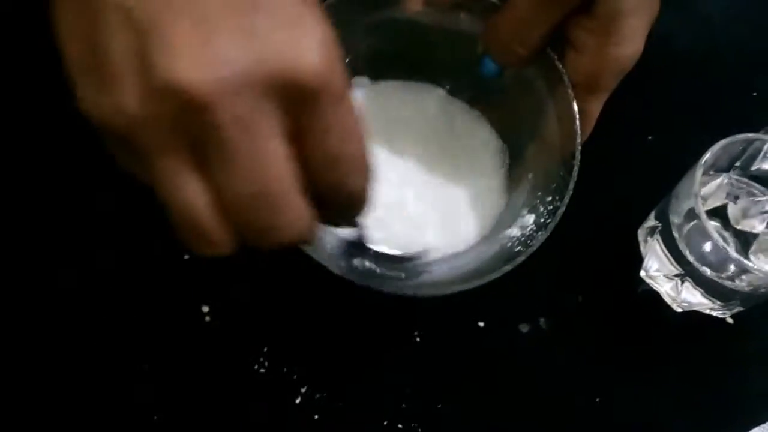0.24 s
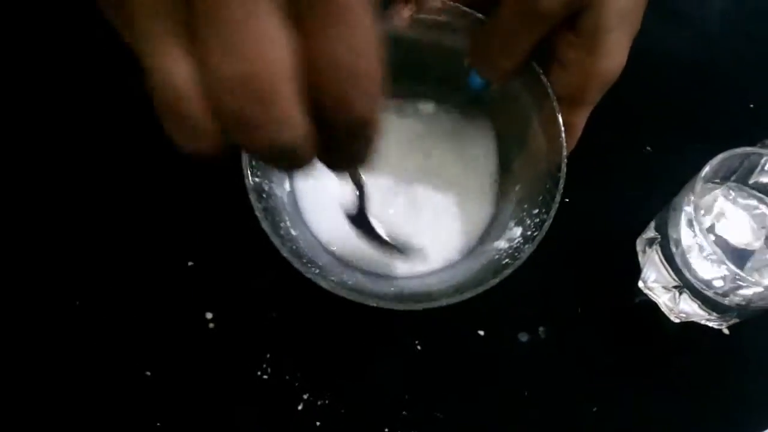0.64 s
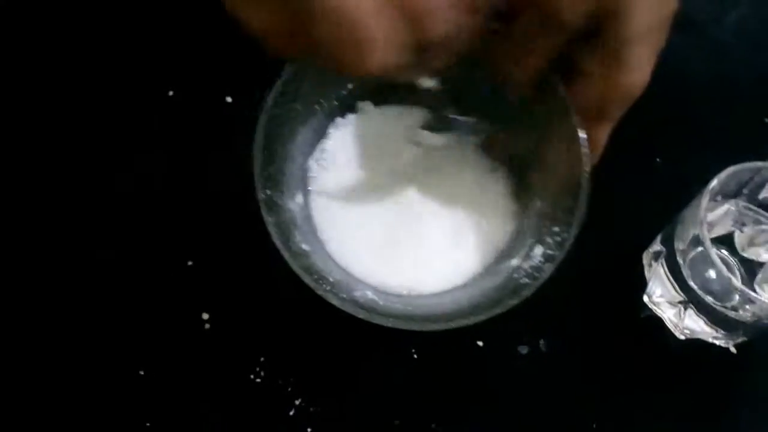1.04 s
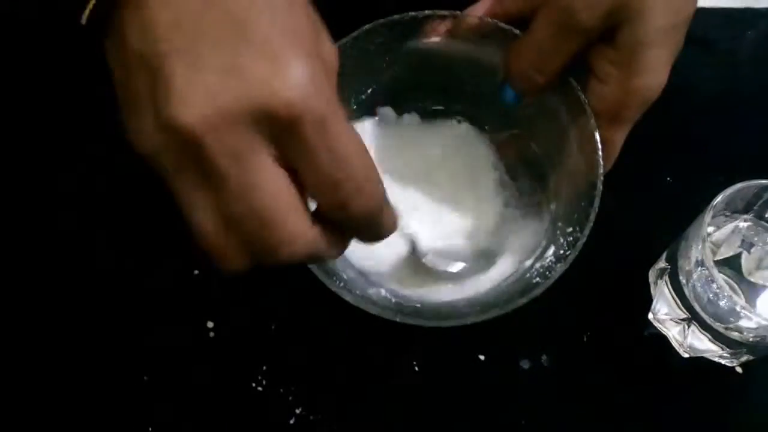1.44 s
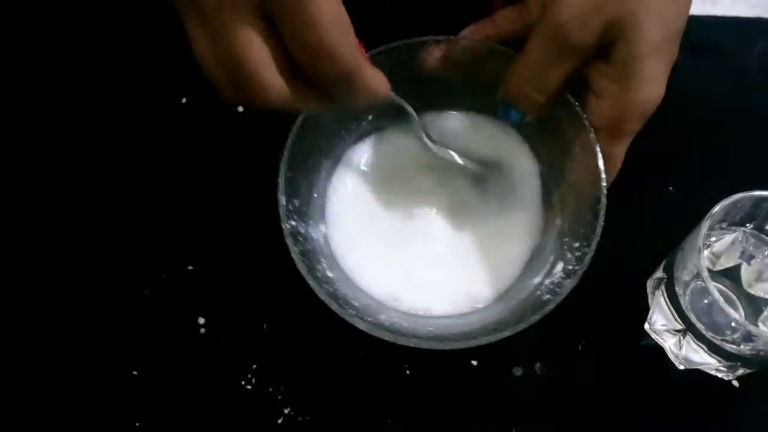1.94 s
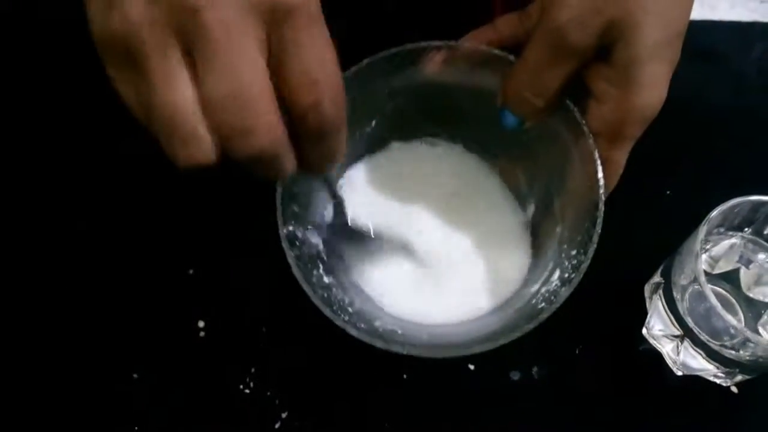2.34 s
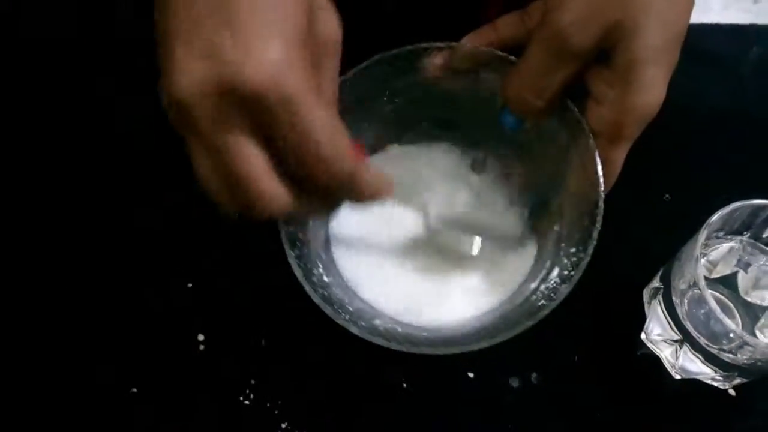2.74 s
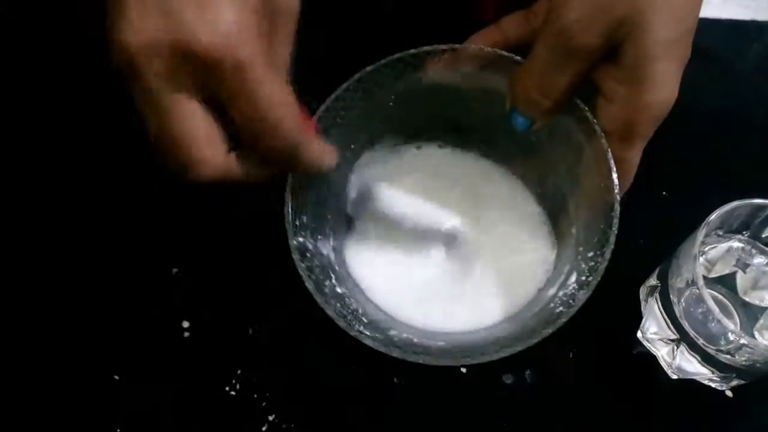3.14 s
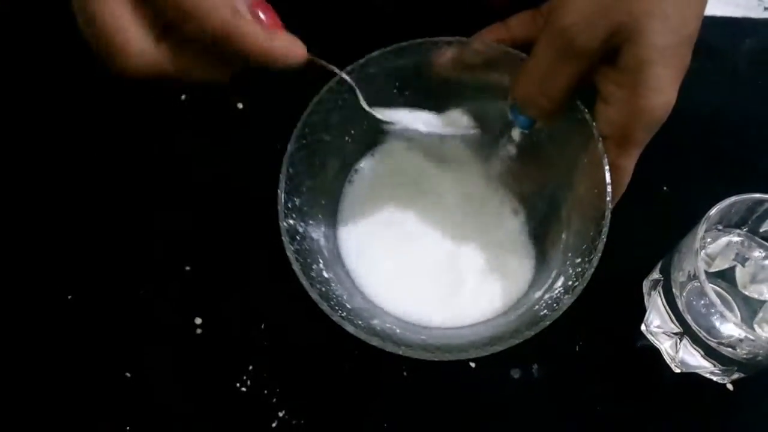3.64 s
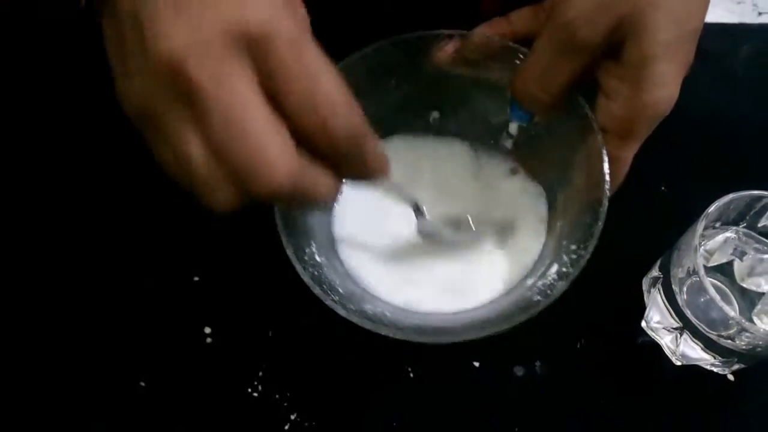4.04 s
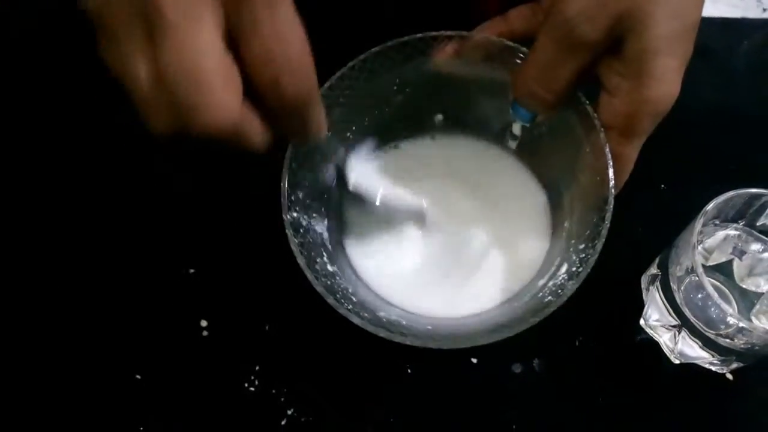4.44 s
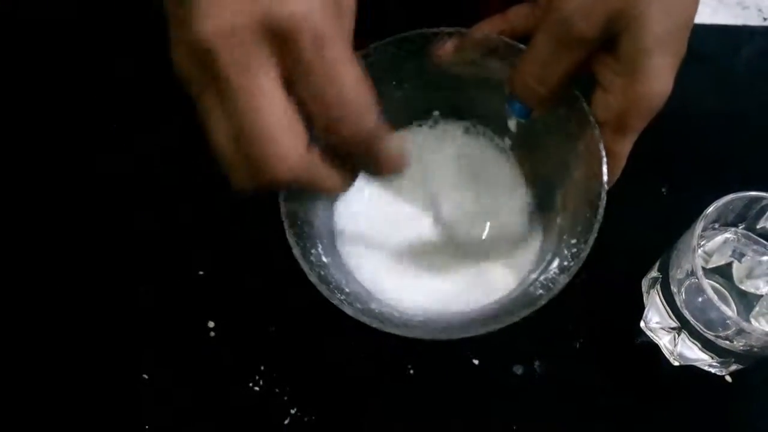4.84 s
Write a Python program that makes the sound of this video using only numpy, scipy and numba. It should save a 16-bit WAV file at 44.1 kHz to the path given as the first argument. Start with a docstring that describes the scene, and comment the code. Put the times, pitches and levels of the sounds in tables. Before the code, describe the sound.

A metal spoon stirs liquid in a glass bowl, with quick gritty scrapes and a few sharp clinks, close up.

```python
"""A metal spoon stirs a milky liquid in a hand-held glass bowl, in a small kitchen.
First come short strokes: the spoon grinds over undissolved grains, swelling, easing, turning hollower.
It hits the wall hard at 0.8 s, slides on dry glass and hits again at 1.2 s; hand and liquid damp it.
Strokes, taps and bubble chirps go on to 4.9 s; a squeak at 2.9 s, a thin rasp at 3.1 s, a drip at 3.8 s.
Throughout, the close microphone hisses faintly; a limiter holds the peaks."""
import sys
import numpy as np
from scipy import signal
from scipy.fft import rfft, irfft
from scipy.io import wavfile
from scipy.ndimage import uniform_filter1d, minimum_filter1d
from numba import njit

SR = 44100
rng = np.random.default_rng(int(sys.argv[2]) if len(sys.argv) > 2 else 0)


def inscribe(sig):
    """Save sig as 16-bit PCM at rate SR to the path in sys.argv[1].

    A 1-D sig is mono; a 2-D sig holds one channel per row.
    Samples are clipped to [-1, 1] before scaling.
    """
    pcm = np.round(np.clip(np.atleast_2d(sig).T, -1, 1) * 32767)
    wavfile.write(sys.argv[1], SR, pcm.astype(np.int16))


N = 224763
TIME = np.arange(N) / SR


def stirring(hollow_growth_db=1.5, lead_s=.02):
    """Spoon strokes: gains of the middle, hollow and bite bands, and the spoon's pitch."""
    # start/s, firmest/s, end/s, level/dB, swell/dB, hollow/dB rel., bite/dB rel., f start/Hz, f end/Hz
    strokes = [(0.112, 0.120, 0.158, -38, 9, -13, -31, 2294, 2480),
               (0.355, 0.365, 0.405, -39.5, 5, -3, -2.5, 2300, 2390),
               (0.455, 0.514, 0.56, -19.5, 21.5, -4.5, -1, 2260, 1890),
               (1.340, 1.440, 1.404, -31.5, 1.5, -7, -3, 2120, 2130),
               (1.480, 1.520, 1.64, -46.5, 0, -8.5, -0.5, 2300, 2250),
               (1.670, 1.765, 1.943, -26.5, 10.5, -6, -7, 2026, 2190),
               (2.200, 2.242, 2.256, -42.5, 2, 6, -12, 2540, 2430),
               (2.290, 2.345, 2.4, -31, 4, -16, -8.5, 2338, 2260),
               (2.400, 2.460, 2.585, -25.5, 5.5, -14, -2.5, 2320, 2600),
               (2.780, 2.830, 2.86, -41, 0, -10, -10, 2450, 2430),
               (2.920, 2.955, 2.93, -41, 17, -18, -18, 2320, 2270),
               (3.050, 3.245, 3.300, -30.5, 10.5, -5.5, -3, 2230, 2020),
               (3.905, 3.915, 3.975, -44, 10, -16, -22, 2640, 2430),
               (4.058, 4.115, 4.172, -42.5, 3, 3.5, -5, 2180, 2220),
               (4.380, 4.495, 4.682, -22, 23, -10.5, -5.5, 2240, 2150),
               (4.810, 4.842, 4.910, -38, 12.5, 5, -3.5, 2170, 2197),
               (4.950, 4.995, 4.85, -39.5, 1, -10, -19, 2470, 2370)]
    middle, hollow, bite = np.zeros((3, N))
    spoon_hz = np.full(N, float(strokes[0][-2]))
    for start_s, firmest_s, end_s, level_db, swell_db, hollow_db, bite_db, start_hz, end_hz in strokes:
        press = pressure(start_s, firmest_s, end_s, level_db, swell_db)
        progress = np.clip((TIME - start_s) / (end_s - start_s), 0, 1)
        hollow += press * from_db(hollow_db + hollow_growth_db * (progress - .5))
        bite += press * from_db(bite_db)
        middle += press * np.sqrt(np.clip(1 - from_db(bite_db) ** 2, .15, 1))   # what the bite leaves
        spoon_hz = np.where(TIME > start_s - lead_s, start_hz + (end_hz - start_hz) * progress, spoon_hz)
    return middle, hollow, bite, spoon_hz


def pressure(start_s, firmest_s, end_s, level_db, swell_db, land_s=.02, lift_s=.015, arch=1.64, ease=.67):
    """Gain of one rub: the spoon lands, presses harder in an arch, eases and lifts."""
    before = np.clip((firmest_s - TIME) / max(firmest_s - start_s, .005), 0, 1)
    after = np.clip((TIME - firmest_s) / max(end_s - firmest_s, .005), 0, 1)
    touching = np.clip(1 + np.minimum((TIME - start_s) / land_s, (end_s - TIME) / lift_s), 0, 1)
    return touching * from_db(level_db - swell_db * (before ** arch + ease * after ** arch))


def scraping(middle, hollow, bite, spoon_hz):
    """Stick-slip over grains excites spoon and glass; the liquid squelches round the spoon."""
    # spoon pressed on wet glass, three mode groups: f/Hz, width/Hz, level/dB
    hollow_modes = [(657, 117, -8.5), (957, 122, 2.5), (1246, 114, 5.5)]
    middle_modes = [(2070, 590, -4.5), (2710, 200, 2.5)]
    bite_modes = [(3302, 102, 2.5), (4300, 1530, -5), (4570, 614, 2), (4590, 660, -17.5)]
    # the spoon catches and grinds briefly: t/s, level/dB, half length/s, favoured f/Hz
    catches = [(0.518, -30, 0.0017, 3830), (1.434, -18.5, 0.0066, 4680), (1.457, -26, 0.0043, 2180),
               (1.775, -18.5, 0.0077, 3650), (1.824, -24, 0.0068, 2780), (1.865, -17, 0.0027, 3380),
               (2.241, -21, 0.0023, 2405), (2.526, -23, 0.0041, 3300), (3.185, -26, 0.003, 3860),
               (3.199, -29, 0.0025, 2200), (3.247, -13, 0.0082, 3370), (4.117, -27, 0.0059, 3700)]
    friction = grains(per_s=4500, spread_db=2) * from_db(2.5 * drift(67))
    low = body(friction, hollow_modes, wander=.016, flicker_db=3.5)
    low = rms_one(cut(low, [480, 2000], "band"))
    spoon = rms_one(resonate(friction, spoon_hz, width_hz=130.0))
    glass = body(friction, middle_modes, wander=.084, flicker_db=2.5)
    mid = rms_one(cut(spoon + from_db(-4) * glass, [1600, 3200], "band"))
    high = body(friction, bite_modes, wander=.021, flicker_db=3)
    high = rms_one(cut(cut(high, 2200, "high"), 4870, "low", order=8))
    fizz = rms_one(cut(cut(friction, 4900, "high", order=4), 5100, "low"))
    catch = sum(from_db(db - 3) * np.exp(-.5 * ((TIME - s) / half_s) ** 2) for s, db, half_s, _ in catches)
    catch_s, _, _, catch_hz = np.transpose(catches)
    grinding = rms_one(resonate(mid + high, np.interp(TIME, catch_s, catch_hz), width_hz=540.0))
    return (low * np.hypot(hollow * from_db(-2), catch * from_db(-11))
            + mid * middle * from_db(-2)
            + high * bite * from_db(-1)
            + grinding * catch
            + fizz * np.hypot(bite, catch) * from_db(-25)
            + squelch() * np.hypot(middle, bite) * from_db(-1))


def taps(tick_rows, hard_above_db=-12.5, rebound_s=.0017, rebound_hz=4330, focus_db=12, focus_oct=.13):
    """Blows ring the bowl, most near the pitch their place favours; each tap adds a crack and a thud."""
    # spoon on the wall: t/s, level/dB, favoured f/Hz, low modes/dB, treble modes/dB
    wall_taps = [(0.0990, -19, 2280, -14, -17), (0.108, -20, 2220, 1, -22), (0.1260, -22.5, 2500, 3, -16),
                 (0.4386, -15, 3800, 4, -20), (0.7907, 0.5, 2670, -9, 9.5), (1.2180, 5.5, 2940, 5, -1.5),
                 (1.2325, -11, 2120, 5.5, -20), (1.2490, -13, 905, 13, -18), (1.5220, -21, 2294, -12, -10),
                 (1.6681, -19.5, 3300, 18, -16), (1.9054, -13.5, 3480, 11.5, -30),
                 (1.9780, -22.5, 2290, 22, -14), (2.2350, -13, 2430, -2, -24), (2.3900, -2.5, 3576, -2, 0),
                 (2.4550, -11.5, 4150, 6, -21), (2.487, -11.5, 3420, 0, -28), (2.7592, -23, 3750, 5, -16),
                 (2.9080, -28, 2280, 7.5, -11), (3.3207, -13, 3930, 11, 1), (3.8874, -18.5, 2950, 8, -6),
                 (4.0560, -22, 1180, 24, -17), (4.281, -29.5, 4700, 12, -12), (4.6207, -9, 3420, 10, -2.5)]
    # modes of bowl and spoon together: f/Hz, level/dB, t60/s
    bowl_modes = [(543, -11.5, 0.018), (706, -25, 0.16), (917, -6, 0.032), (1181, -6, 0.022),
                  (2017, 4, 0.019), (2246, 0.5, 0.07), (2527, 7, 0.02), (2641, 3, 0.037), (3060, -6, 0.082),
                  (3076, 4, 0.019), (3398, -1, 0.038), (3640, -2.5, 0.035), (4300, -0.5, 0.033),
                  (4640, -10, 0.036), (4860, 6.5, 0.014), (5370, -6.5, 0.031), (6390, 3, 0.015),
                  (6380, -14.5, 0.048), (8300, -21, 0.063), (9200, -42, 0.016), (12060, -30, 0.027)]
    rings, cracks, thuds = np.zeros((3, N))
    t = TIME[:SR // 10]
    hz, mode_db, t60_s = np.transpose(bowl_modes)
    onset = 1 - np.exp(-t / .00011)
    modes = np.sin(2 * np.pi * np.outer(hz, t)) * from_db(-60 * np.outer(1 / t60_s, t)) * onset
    for s, db, place_hz, low_db, treble_db in wall_taps + tick_rows:
        hard_db = max(db - hard_above_db, 0)   # hard taps meet bare glass
        damping_db_per_s = 65 * hard_db
        dry_db = .46 * treble_db   # dry contact is livelier
        tilt_db = low_db * (hz < 1500) + treble_db * (hz > 5100)
        blows = [(s, db, place_hz)]
        if hard_db:
            blows.append((s + rebound_s, db - 3.5 + dry_db, rebound_hz))
        for blow_s, blow_db, favoured_hz in blows:
            near = np.exp(-.5 * (np.log2(hz / favoured_hz) / focus_oct) ** 2)
            scatter_db = 3.5 * rng.standard_normal(len(hz))
            gains = from_db(mode_db + focus_db * near + tilt_db + scatter_db)
            gains = gains / np.linalg.norm(gains) * rng.choice([-1, 1], len(hz))
            add(rings, blow_s, gains @ modes * from_db(blow_db - damping_db_per_s * t))
        chatter = np.tanh(2 * rng.standard_normal(len(t))) * np.exp(-t / .0023)
        add(cracks, s, from_db(db + .65 * hard_db + dry_db) * chatter)
        add(thuds, s, from_db(1.62 * db) * chatter)   # the thud grows steeply with the blow, so hard blows shake the whole bowl
    return (from_db(-3) * cut(rings, 520, "high")
            + from_db(-24) * cut(cracks, [1500, 12000], "band")
            + from_db(-30) * cut(thuds, [50, 450], "band", order=1))


def ticks(contact, tries=190, low_hz=2200, high_hz=4400, top_db=9, spread_db=8, treble_db=-16):
    """Grains pass under the spoon: rows of light random taps, scaled by its contact."""
    rows = []
    for when, weakness, place in rng.random((tries, 3)):
        press = contact[int(when * N)]
        if press > 0:
            db = 20 * np.log10(press) + top_db - spread_db * weakness
            rows.append((when * TIME[-1], db, low_hz * (high_hz / low_hz) ** place, 0, treble_db))
    return rows


def slide():
    """On dry glass above the liquid the rubbing spoon rings freely."""
    # rubs: start/s, firmest/s, end/s, level/dB, swell/dB
    slides = [(0.815, 1.01, 1.036, -32.5, 12)]
    # dry glass modes: f/Hz, width/Hz, level/dB
    dry_modes = [(2310, 600, 1), (2800, 170, 8), (3800, 160, -11), (4500, 120, 3.5), (5350, 210, -15),
                 (6400, 170, -7)]
    ring = body(grains(per_s=2800, spread_db=2), dry_modes, wander=.0051, flicker_db=4)
    return sum(pressure(*row) for row in slides) * ring


def rasp(start_hz=6340, climb_hz_per_s=13600):
    """The spoon's edge, drawn up the wall, makes a narrow climbing hiss."""
    # rub: start/s, firmest/s, end/s, level/dB, swell/dB
    rasps = [(3.105, 3.245, 3.275, -53, 9)]
    start_s, _, end_s, _, _ = rasps[0]
    hz = start_hz + climb_hz_per_s * (np.clip(TIME, start_s, end_s) - start_s)
    rubbing = grains(per_s=2500, spread_db=7) * from_db(4.2 * drift(77))
    ring = resonate(rubbing, hz, width_hz=650.0)
    return pressure(*rasps[0]) * rms_one(cut(ring, [5500, 10000], "band"))


def chirps_and_drop(tick_s=.0018):
    """Short gliding tones: bubble chirps, drips and a brief squeak of the spoon; a falling drop ticks."""
    # gliding tones: t/s, level/dB, f/Hz, rise/(oct/s), time to peak/s
    tones = [(0.354, -34.5, 3310, 5, 0.0044), (0.377, -35.5, 3580, 14, 0.0023),
             (2.221, -22.5, 2600, -3, .0015), (2.299, -19.5, 2267, 3.5, 0.003),
             (2.944, -35.5, 2300, -1.5, .01), (3.742, -37.5, 4180, -3, 0.0018),
             (3.742, -36, 2800, 5, 0.0018), (3.794, -37, 1156, 5, 0.0031), (3.812, -35, 3363, 36, 0.0019),
             (4.465, -16.5, 2063, 18.5, 0.0023), (4.480, -15.5, 2760, 43, 0.0013),
             (4.495, -15, 3917, 37, 0.0008), (4.513, -18, 4370, 13, 0.0029)]
    # drop on the surface: t/s, level/dB
    drops = [(3.792, -25.5)]
    out, t = np.zeros(N), TIME[:SR // 10]
    for s, db, hz, rise_oct_per_s, peak_s in tones:
        add(out, s, from_db(db) * gliding_tone(hz, rise_oct_per_s, peak_s))
    for s, db in drops:
        splash = rng.standard_normal(len(t)) * np.exp(-t / tick_s)
        add(out, s, from_db(db) * cut(splash, [5000, 12000], "band"))
    return out


def squelch(count=260, low_hz=2100, high_hz=4100, spread_db=10):
    """Tiny bubbles form at random behind the spoon, peaking after about eight cycles."""
    out = np.zeros(N)
    for when, pitch, weakness, rise in rng.random((count, 4)):
        hz = low_hz * (high_hz / low_hz) ** pitch
        add(out, when * TIME[-1], from_db(-spread_db * weakness) * gliding_tone(hz, 14 * rise, 8 / hz))
    return cut(out, 3600, "low", order=8)


def gliding_tone(hz, rise_oct_per_s, peak_s):
    """A short sine swells, glides in pitch and dies."""
    t = TIME[:SR // 25]
    glide_hz = hz * 2 ** np.minimum(rise_oct_per_s * t, .5)
    envelope = t / peak_s * np.exp((1 - (t / peak_s) ** 1.09) / 1.2)
    return envelope * np.sin(2 * np.pi * np.cumsum(glide_hz) / SR)


def kitchen(x, wet_db=-11.44, build_s=.0059):
    """Dense echoes off hard walls, each band dying at its own rate."""
    # echo colour: f/Hz, level/dB, t60/s
    room = [(100, -10, 0.51), (496, 3.5, 0.9), (970, 0.5, 0.25), (1380, 10.5, 0.4), (2156, 8, 0.35),
            (3270, -15.5, 0.26), (4370, -0.5, 0.4), (7060, -5, 0.22), (11000, 3.5, 0.29),
            (14300, -12, 0.38)]
    t, edges_hz = TIME[:SR * 3 // 4], np.geomspace(80, 16000, 16)
    echo = np.zeros(len(t))
    for low_hz, high_hz in zip(edges_hz, edges_hz[1:]):
        hz = np.sqrt(low_hz * high_hz)
        band = cut(rng.standard_normal(len(t)), [low_hz, high_hz], "band")
        echo += band * from_db(at_hz(room, hz) - 60 * t / at_hz(room, hz, column=2))
    echo *= np.clip(t / build_s - .5, 0, 1)
    return from_db(wet_db) * signal.fftconvolve(x, echo / np.linalg.norm(echo))[:N]


def hiss(level_db=-44.5):
    """Steady noise of room and microphone."""
    # noise density: f/Hz, level/dB
    density = [(30, -30), (62, -29.5), (120, -18.5), (220, -9), (400, -9.5), (670, -3), (790, -6.5),
               (1300, -5), (2100, 1.5), (3200, -5.5), (4700, -10), (6000, -19.5), (9000, -19),
               (15800, -25.5)]
    hz = np.arange(N // 2 + 1) * SR / N
    spectrum = rfft(rng.standard_normal(N)) * from_db(at_hz(density, hz))
    return from_db(level_db) * rms_one(irfft(spectrum, N))


def grains(per_s, spread_db):
    """Random clicks of uneven size; rms 1."""
    sizes = from_db(spread_db * np.minimum(rng.exponential(1, N), 4)) * rng.choice([-1, 1], N)
    return rms_one(sizes * (rng.random(N) < per_s / SR))


def body(x, modes, wander, flicker_db):
    """Parallel resonances, shifting in pitch and strength as contact and liquid move; rms 1."""
    out = np.zeros(N)
    for k, (hz, width_hz, db) in enumerate(modes):
        gain = (-1) ** k * from_db(db + flicker_db * drift(21))
        out += gain * resonate(x, hz * (1 + wander * drift(15)), float(width_hz))
    return rms_one(out)


@njit
def resonate(x, hz, width_hz):
    """Two-pole resonance, moving centre, peak gain 1."""
    r, y = np.exp(-np.pi * width_hz / SR), np.zeros(len(x))
    for i in range(2, len(x)):
        drive = (1 - r * r) / 2 * (x[i] - x[i - 2])
        y[i] = drive + 2 * r * np.cos(2 * np.pi * hz[i] / SR) * y[i - 1] - r * r * y[i - 2]
    return y


def drift(rate_hz):
    """Low-passed noise; rms 1."""
    return rms_one(cut(rng.standard_normal(N + SR), rate_hz, "low")[SR:])


def cut(x, hz, kind, order=2):
    """Butterworth filter."""
    sos = signal.butter(order, np.clip(hz, 10, .45 * SR), kind, fs=SR, output="sos")
    return signal.sosfilt(sos, x + 1e-18)


def at_hz(points, hz, column=1):
    """Interpolate a column over log frequency."""
    table = np.array(points)
    return np.interp(np.log(hz + 1), np.log(table[:, 0]), table[:, column])


def add(out, s, sound):
    """Mix a sound in at time s."""
    start = max(0, round(s * SR))
    out[start:start + len(sound)] += sound[:N - start]


def from_db(db):
    """Decibels to gain."""
    return 10 ** (np.asarray(db) / 20)


def rms_one(x):
    """Scale to rms 1."""
    return x / np.sqrt(np.mean(x ** 2) + 1e-20)


def scene(left_db=-4, right_db=1, own_hiss_db=-27):
    """Same sound in both channels, right louder, each with a trace of its own hiss."""
    middle, hollow, bite, spoon_hz = stirring()
    bowl = scraping(middle, hollow, bite, spoon_hz) + slide() + rasp() + chirps_and_drop()
    bowl += taps(ticks(contact=np.hypot(middle, bite)))
    own_hiss = from_db(own_hiss_db) * np.array([hiss(), hiss()])
    return (bowl + kitchen(bowl) + hiss()) * from_db([[left_db], [right_db]]) + own_hiss


def record(dry, ceiling=.9, release_db_per_s=2500, cutoff_hz=16000):
    """Fast limiter on the hardest taps, then a steep low-pass."""
    over_db = np.maximum(20 * np.log10(np.abs(dry).max(axis=0) / ceiling + 1e-9), 0)
    held_db = np.maximum.accumulate(over_db + release_db_per_s * TIME) - release_db_per_s * TIME
    gain = uniform_filter1d(minimum_filter1d(from_db(-held_db), size=15), size=15)
    return signal.sosfilt(signal.ellip(12, .1, 90, cutoff_hz, fs=SR, output="sos"), dry * gain)


dry = scene()
out = record(dry)
inscribe(out)
```